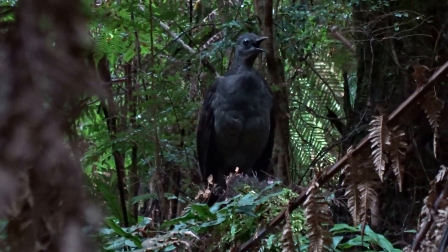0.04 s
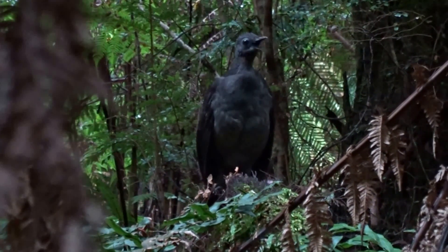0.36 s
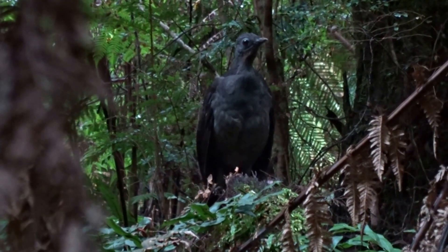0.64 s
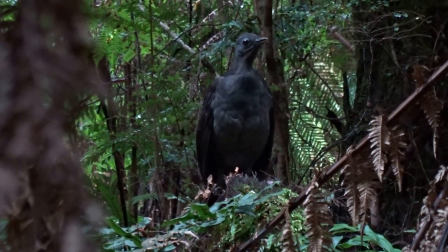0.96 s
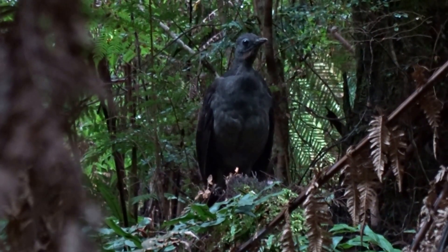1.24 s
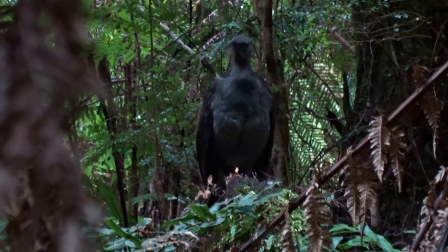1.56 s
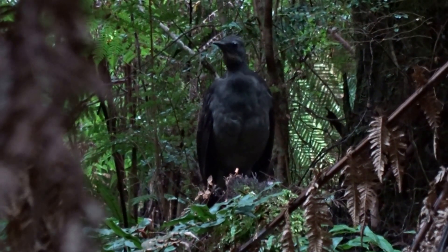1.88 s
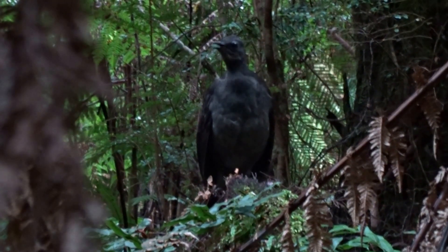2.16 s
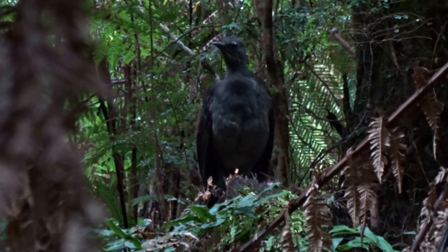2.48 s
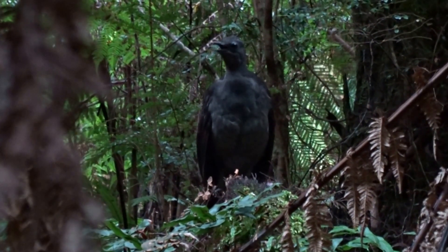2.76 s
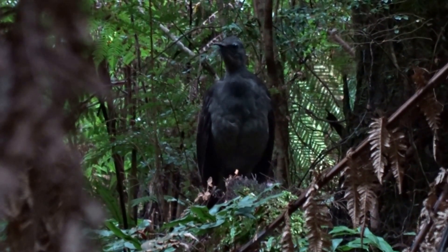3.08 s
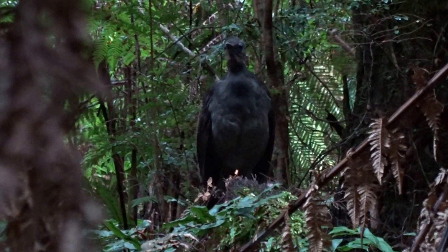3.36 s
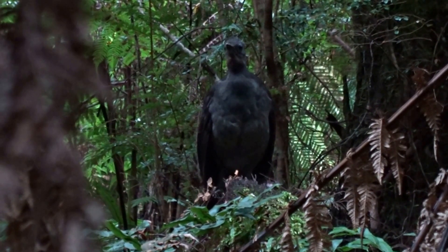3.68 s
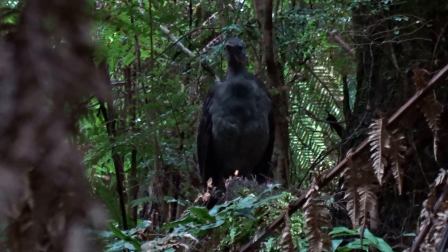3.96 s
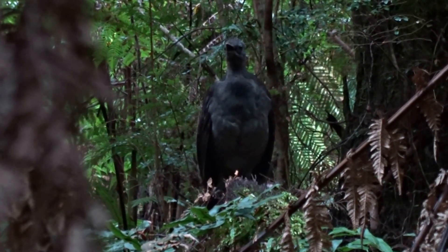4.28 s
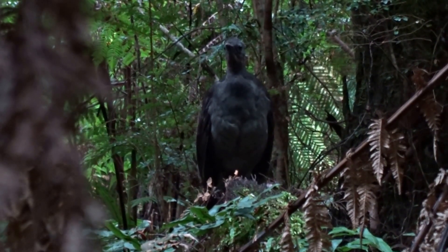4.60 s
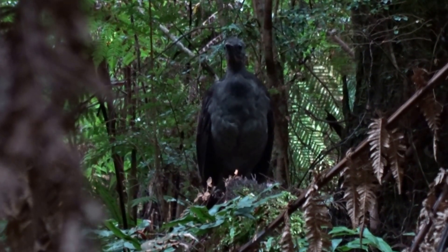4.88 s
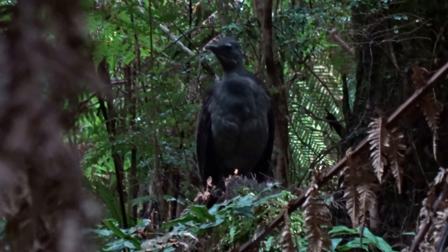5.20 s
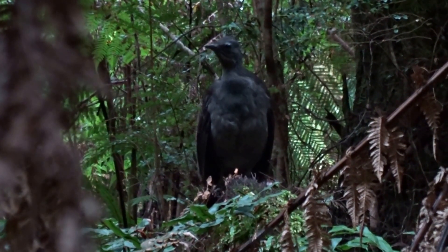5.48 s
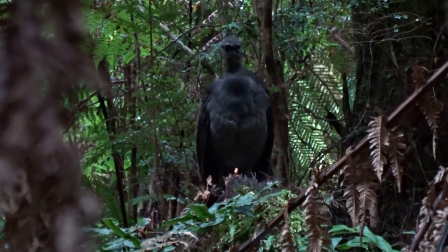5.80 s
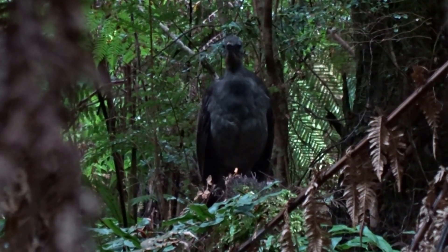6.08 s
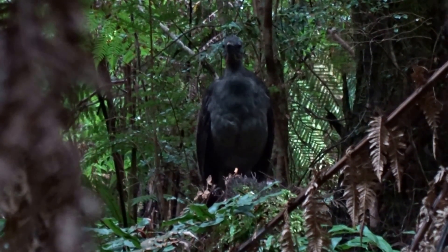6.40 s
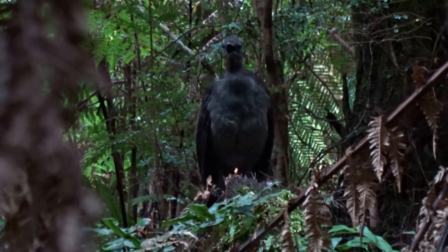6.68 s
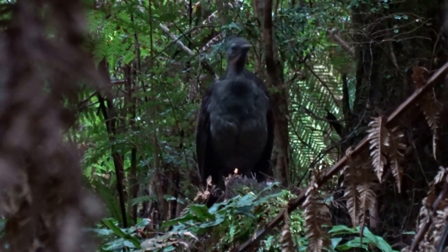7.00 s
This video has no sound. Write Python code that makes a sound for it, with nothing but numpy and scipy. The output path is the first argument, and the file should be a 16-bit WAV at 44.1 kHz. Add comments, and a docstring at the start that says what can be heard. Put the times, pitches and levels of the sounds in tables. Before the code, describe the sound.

A bird softly clucks and rattles, then gives whistles, whip-crack calls, a caw and a hoarse cry over steady forest hiss.

```python
"""Lyrebird in a wet fern forest.

The bird sings softly: whistled glides, whip cracks, rattles, nasal notes, a caw, a mew, a hoarse cry.
Its syrinx sounds harmonics and clicks through the throat; trunks scatter each call into a short tail.
Under it lie the even rush of the forest and microphone hiss, both stronger on the right."""
import sys
import numpy as np
from scipy import signal
from scipy.fft import rfft, irfft, next_fast_len
from scipy.io import wavfile

SR = 44100
rng = np.random.default_rng(int(sys.argv[2]) if len(sys.argv) > 2 else 0)


def store_pcm(level_fs):
    """Save levels as 16-bit WAV."""
    pcm = np.round(np.clip(level_fs, -1, 1) * 32767).astype(np.int16)
    wavfile.write(sys.argv[1], SR, np.atleast_2d(pcm).T)


N = 310905
TIME = np.arange(N) / SR
TOP_HZ = 15650

# overtones of whistles and clucks: freq_hz, gain_db
PURE_OVERTONES = [(1400, -29), (3000, -47), (4800, -37), (7000, -18), (8700, -23), (10800, -7.5),
                  (14000, -43)]
# throat response of caw and chuckle: freq_hz, gain_db
LOW_THROAT = [(550, -7), (1030, 3.5), (1200, 2.5), (1450, -22), (1570, -15), (1630, -2.5), (1700, 2),
              (1780, -13), (2200, -34), (3500, -29), (6000, -33), (11000, -32), (14000, -46)]
# throat response of rattles and chip: freq_hz, gain_db
CLICK_THROAT = [(120, -63), (400, 2), (1000, 8), (1700, -10), (2400, 9), (3100, -5), (4000, 3),
                (5200, -2.5), (6600, -1.5), (8500, -14), (10500, 3.5), (14000, -31)]


def undb(db):
    return 10 ** (np.asarray(db) / 20)


def unit(x):
    """Scale to rms 1."""
    return x / np.sqrt(np.mean(np.abs(x) ** 2) + 1e-20)


def at(points, hz):
    """Read (freq_hz, value) points on a log-frequency axis."""
    freq_hz, value = np.transpose(points)
    return np.interp(np.log(np.maximum(hz, 1)), np.log(freq_hz), value)


def colour(x, points, lead=((1, 0),)):
    """Filter by (freq_hz, gain_db) points and a (freq_hz, lead_rad) curve."""
    size = next_fast_len(len(x) + 2048)
    hz = np.fft.rfftfreq(size, 1 / SR)
    response = undb(at(points, hz)) * np.exp(1j * at(lead, hz))
    return irfft(rfft(x, size) * response, size)[:len(x)]


def flutter(count, hz):
    """Complex noise of rms 1 and Gaussian bandwidth hz."""
    size = next_fast_len(count + 4096)
    bins = rng.standard_normal(size) + 1j * rng.standard_normal(size)
    lowpass = np.exp(-.5 * (np.fft.fftfreq(size, 1 / SR) / hz) ** 2)
    return unit(np.fft.ifft(bins * lowpass))[:count]


def snap(decay_s, count=512):
    """Decaying noise burst."""
    return rng.standard_normal(count) * np.exp(-TIME[:count] / decay_s)


def add(out, start_s, x):
    i = max(int(start_s * SR), 0)
    out[i:i + len(x)] += x[:max(N - i, 0)]


def clock(length_s):
    return np.arange(int(max(length_s, .005) * SR)) / SR


def swell(t, attack_s, release_s):
    """Attack, hold, release; quarter-sine ramps."""
    rise = np.sin(np.pi / 2 * np.clip(t / attack_s, 0, 1))
    fall = np.sin(np.pi / 2 * np.clip((t[-1] - t) / release_s, 0, 1))
    return rise * fall


def arch(t, first, middle, last):
    """Parabola over a note."""
    u = t / t[-1]
    return first + (last - first) * u + (middle - (first + last) / 2) * (1 - (2 * u - 1) ** 2)


def gesture(rows):
    """Start time, then each further column of a (time_s, ...) table as a curve."""
    times, *columns = np.transpose(rows)
    t = times[0] + clock(times[-1] - times[0])
    return [times[0]] + [np.interp(t, times, column) for column in columns]


def syrinx(hz, rough, throat, pure=False, jitter=0.0034, rasp_hz=70, clean_db=-16.5, hoarse_db=-5.0):
    """Harmonics under the throat response; a rough membrane (0-1) smears each into a band."""
    rough, count = np.clip(rough, 0, 1), len(hz)
    phase = 2 * np.pi * np.cumsum(hz * (1 + jitter * flutter(count, 150).real)) / SR
    # a pure voice sheds overtones as it clears
    buzz = undb(np.interp(rough, [0, .5], [clean_db, hoarse_db])) if pure else 1
    voice = np.zeros(count)
    for k in range(1, int(TOP_HZ / hz.min()) + 1):
        gain = 1 if pure and k == 1 else buzz * undb(at(throat, k * hz)) * (k * hz < TOP_HZ)
        swing = np.sqrt(1 - rough ** 2) + rough * flutter(count, rasp_hz * np.sqrt(k))
        voice += gain * (swing * np.exp(1j * k * phase)).imag
    return voice


def whistle_tone(hz, rough, strain_db=0):
    """Near-pure voice, loudest at the throat resonance; strain lifts the overtones."""
    # throat resonance: pitch_hz, gain_db
    throat = [(720, -12), (900, -18), (1400, -12.5), (1800, -4.5), (2250, -1), (2720, -8.5), (2950, -20.5),
              (3300, -22), (4500, -47)]
    voice = syrinx(hz, rough, PURE_OVERTONES, pure=True, jitter=0.00069,
                   clean_db=strain_db - 24, hoarse_db=strain_db - 12)
    return undb(at(throat, hz)) * voice


def whistles(release_s=0.011):
    """Three arched glides and one upslur that hurries through its middle."""
    # glides: start_s, length_s, first_hz, middle_hz, last_hz, drive_db, attack_s, roughness
    glides = [(0, .03, 2300, 2600, 2840, -34.5, 0.00043, 0), (0.02, 0.12, 2920, 2460, 1940, -31, .1, 0.06),
              (5.109, 0.065, 745, 700, 630, -32, .02, .1)]
    # rising whistle: time_s, pitch_hz, drive_db
    upslur = [(3.508, 1760, -46), (3.533, 2055, -28.5), (3.56, 2770, -23.5), (3.58, 3080, -26),
              (3.62, 3400, -18.5), (3.63, 3500, -42)]
    out = np.zeros(N)
    for start_s, length_s, first_hz, middle_hz, last_hz, db, attack_s, rough in glides:
        t = clock(length_s)
        hz = arch(t, first_hz, middle_hz, last_hz)
        add(out, start_s, undb(db) * swell(t, attack_s, release_s) * whistle_tone(hz, rough))
    start_s, hz, db = gesture(upslur)
    add(out, start_s, undb(db) * whistle_tone(hz, rough=0.17))
    return out


def whips(sag_hz_per_s=567, break_hz=1290, break_octaves=0.3, break_rough=.9, base_rough=0.08):
    """A forced whistle plunges, breaks on the way and holds a low, sagging note."""
    # cracks: start_s, length_s, top_hz, held_hz, fall_octaves_per_s, first_db, last_db, attack_s
    cracks = [(3.276, .148, 4816, 785, 34.5, -16.5, -29, .0098),
              (3.643, .098, 2380, 860, 37, -29, -22.5, 0.0068)]
    out = np.zeros(N)
    for start_s, length_s, top_hz, held_hz, fall, first_db, last_db, attack_s in cracks:
        t = clock(length_s)
        hz = np.maximum(top_hz * 2 ** (-fall * t), held_hz - sag_hz_per_s * t)
        breaking = np.exp(-(np.log2(hz / break_hz) / break_octaves) ** 2)
        rough = base_rough + (break_rough - base_rough) * breaking
        drive = undb(np.linspace(first_db, last_db, len(t))) * swell(t, attack_s, release_s=0.0098)
        add(out, start_s, drive * whistle_tone(hz, rough, strain_db=9.5))
    return out


def nasal_notes(droop_share=0.0207, rough=0.3):
    """Four short, slightly arched notes rich in harmonics."""
    # notes: start_s, length_s, pitch_hz, climb_share, drive_db
    notes = [(4.194, 0.043, 1186, 0.03, -34.5), (4.278, 0.044, 1151, 0.056, -31),
             (4.368, 0.052, 1119, -0.013, -30.5), (4.473, 0.042, 1075, -0.0073, -32.5)]
    # throat response: freq_hz, gain_db
    throat = [(1100, -17), (2200, -5), (3350, -16), (4500, -23), (5600, -24), (6700, -28.5), (8300, -41),
              (9700, -23.5), (10500, -13.5), (11500, -28), (14000, -49)]
    out = np.zeros(N)
    for start_s, length_s, pitch_hz, climb, db in notes:
        t = clock(length_s)
        hz = pitch_hz * arch(t, 1 - climb / 2 - droop_share, 0.99, 1 + climb / 2 - droop_share)
        voice = syrinx(hz, rough, throat, jitter=0.0063)
        add(out, start_s, undb(db) * swell(t, attack_s=0.018, release_s=0.01) * voice)
    return out


def caw():
    """Two low, sinking pushes; the voice cracks between them."""
    # contour: time_s, pitch_hz, drive_db, roughness
    contour = [(5.11, 618, -55, .2), (5.135, 579.5, -43.5, .05), (5.162, 573.7, -44.5, .05),
               (5.172, 601, -34, .3), (5.183, 567, -44.5, 0.2), (5.2, 548, -40.5, 0),
               (5.235, 514, -37.5, 0.1), (5.243, 541, -48, 0.5), (5.282, 520, -53, 0.2)]
    out = np.zeros(N)
    start_s, hz, db, rough = gesture(contour)
    add(out, start_s, undb(db) * syrinx(hz, rough, LOW_THROAT, jitter=.005, rasp_hz=55))
    return out


def mew(air_db=-11):
    """A breathy second harmonic swells; as the bill opens, the others join and the pitch drops."""
    # contour: time_s, pitch_hz, drive_db, roughness, opening_share
    contour = [(5.67, 855, -49.5, 1, 0), (5.8, 861, -44.5, .9, 0), (5.828, 861, -34, 0.3, 0),
               (5.872, 860, -36.5, 0.28, 0.3), (5.918, 837, -34.5, 0.07, 0.5), (5.942, 820, -34, .5, 0.4),
               (5.96, 781, -37, .35, 0.7), (6.005, 742, -42, 0.1, .9), (6.034, 690, -50, 0.4, 0.9)]
    # throat response: freq_hz, gain_db
    throat = [(780, -4.5), (900, -31), (1450, -6), (1700, 0.5), (2250, -5), (2550, -11), (3200, -22),
              (3750, -23), (4100, -18.5), (4900, -33), (5600, -30), (8500, -44), (10500, -16.5),
              (11500, -21), (14000, -44)]
    # passband of the nearly closed bill: freq_hz, gain_db
    closed_bill = [(1100, -22), (1500, -3), (1950, 0), (2400, -9)]
    out = np.zeros(N)
    start_s, hz, db, rough, opening = gesture(contour)
    voice = syrinx(hz, rough, throat, jitter=0.0072, rasp_hz=119)
    voice = opening * voice + (1 - opening) * colour(voice, closed_bill)
    add(out, start_s, undb(db) * (voice + bill_air(rough, air_db)))
    return out


def cry(air_db=-6):
    """A hoarse, airy whistle swells, breaks and drops to a loud, clear note."""
    # contour: time_s, pitch_hz, level_db, roughness
    contour = [(6.56, 1695, -48, 1.1), (6.58, 1751, -43, 0.75), (6.66, 1845, -40.5, .65),
               (6.724, 1850, -38, 0.5), (6.735, 1790, -31.5, 0), (6.746, 1800, -40, 0.4),
               (6.757, 1800, -34.5, 0.3), (6.767, 1536, -41.5, 0.94), (6.789, 1674, -28.5, 0),
               (6.813, 1680, -31.5, 0.1), (6.824, 1700, -43, 0.5)]
    # overtones: freq_hz, gain_db
    overtones = [(3300, -26), (3750, -17), (5400, -38), (8500, -34), (11500, -24), (14000, -50)]
    out = np.zeros(N)
    start_s, hz, db, rough = gesture(contour)
    voice = syrinx(hz, rough, overtones, pure=True, jitter=0.0047, rasp_hz=137,
                   clean_db=-24, hoarse_db=-3)
    add(out, start_s, undb(db) * (voice + bill_air(rough, air_db)))
    return out


def bill_air(rough, db):
    """Turbulence in the bill, as strong as the voice is rough."""
    # air spectrum: freq_hz, gain_db
    spectrum = [(600, -37), (1300, -9), (1700, 6), (2050, -7), (2400, -2), (2900, -22), (3800, -17),
                (5000, -32), (14000, -45)]
    return undb(db) * np.clip(rough, 0, 1) * unit(colour(rng.standard_normal(len(rough)), spectrum))


def sizzle(width_hz=330, skirt_hz=1100, skirt_db=-5):
    """Air hisses in a narrow, high resonance as the bird strains in caw, mew and cry."""
    # hisses: start_s, length_s, centre_hz, level_db, attack_s, release_s
    hisses = [(5.1, 0.096, 10900, -56, 0.027, .05), (5.741, 0.24, 10520, -51, 0.19, 0.079),
              (6.525, .265, 11200, -51, 0.26, 0.013)]
    out = np.zeros(N)
    for start_s, length_s, hz, db, attack_s, release_s in hisses:
        t = clock(length_s)
        air = flutter(len(t), width_hz) + undb(skirt_db) * flutter(len(t), skirt_hz)
        band = unit((air * np.exp(2j * np.pi * hz * t)).real)
        add(out, start_s, undb(db) * swell(t, attack_s, release_s) * band)
    return out


def clucks(edge_db=-9, bend_share=0.025):
    """Soft, breathy notes that swell and climb a little."""
    # notes: start_s, length_s, pitch_hz, level_db, roughness
    notes = [(0.784, 0.066, 509.6, -44.5, 0.89), (1.188, 0.03, 550, -36.5, 0.44),
             (1.32, .087, 491.7, -44, 0.65), (1.385, 0.078, 540, -45, 0.71), (1.564, 0.016, 1007, -40, 0.2),
             (1.817, .13, 553, -43.5, 0.72), (2.624, 0.021, 773, -39, 0.1), (2.65, .03, 684, -42, 0.5),
             (3.87, 0.019, 472, -44, 0.24), (4.237, 0.015, 453, -40.5, 0), (4.652, 0.034, 576, -42, 0.35)]
    out = np.zeros(N)
    for start_s, length_s, hz, db, rough in notes:
        t = clock(length_s)
        u = np.linspace(-1, 1, len(t))
        voice = syrinx(hz * (1 + bend_share * u), rough, PURE_OVERTONES, pure=True,
                       rasp_hz=99, hoarse_db=-19.0)
        envelope = undb(db + edge_db * np.abs(u)) * swell(t, attack_s=0.0066, release_s=0.01)
        add(out, start_s, envelope * voice)
    return out


def chucks(attack_share=0.36, release_share=0.38):
    """Dull puffs through the closed bill."""
    # puffs: start_s, length_s, level_db
    puffs = [(.618, 0.0098, -44), (2.731, 0.037, -42), (2.846, 0.019, -42.5), (2.864, 0.033, -42.5),
             (3.005, 0.014, -44.5)]
    # throat response: freq_hz, gain_db
    throat = [(300, -32), (1000, 0.5), (1600, -6), (2150, 4.5), (2650, -6), (3200, -32), (6000, -27),
              (14000, -42)]
    out = np.zeros(N)
    for start_s, length_s, db in puffs:
        t = clock(length_s)
        puff = unit(colour(rng.standard_normal(len(t)), throat))
        add(out, start_s, undb(db) * swell(t, attack_share * length_s, release_share * length_s) * puff)
    return out


def chuckle(attack_s=0.004, release_s=0.0063, rough=.15):
    """Five clipped notes in the caw's voice, climbing and slowing."""
    # notes: start_s, length_s, pitch_hz, drive_db
    notes = [(2.077, .023, 477, -44.5), (2.11, 0.03, 508, -42), (2.15, 0.024, 500, -41),
             (2.201, .019, 520, -38.5), (2.252, 0.02, 539, -45)]
    out = np.zeros(N)
    for start_s, length_s, hz, db in notes:
        t = clock(length_s)
        voice = syrinx(np.full(len(t), hz), rough, LOW_THROAT, jitter=0.0098, rasp_hz=91)
        add(out, start_s, undb(db) * swell(t, attack_s, release_s) * voice)
    return out


def rattles(decay_s=0.001, ring_s=0.00083, ring_db=-5, rasp_db=-4, scatter_db=1.4, count=8192):
    """Membrane slaps of uneven strength over a soft rasp, ringing the throat."""
    # click trains: start_s, length_s, rate_hz, drive_db, bright_db, ring_hz
    trains = [(.4305, 0.058, 114, -52, 3, 2270), (0.9154, 0.083, 122, -54.5, -5, 2460),
              (1.53, 0.064, 140, -52.5, -4, 2600)]
    out = np.zeros(N)
    for start_s, length_s, rate_hz, db, bright_db, ring_hz in trains:
        slaps, rings = np.zeros((2, count))
        ring = np.sin(2 * np.pi * ring_hz * TIME[:512]) * np.exp(-TIME[:512] / ring_s)
        for slap_s in np.arange(0, length_s, 1 / rate_hz):
            size = np.interp(slap_s / length_s, [0, .2, .4, .7, 1], [.35, .9, 1, .3, .15])
            size *= undb(scatter_db * rng.standard_normal())
            add(slaps, slap_s, size * unit(snap(decay_s)))
            add(rings, slap_s, size * ring)
        rasp = rng.standard_normal(count) * np.sin(np.pi * np.minimum(TIME[:count] / length_s, 1))
        source = unit(slaps) + undb(rasp_db) * unit(rasp)
        train = unit(colour(source, CLICK_THROAT)) + undb(ring_db) * unit(rings)
        train = colour(train, [(2600, 0), (3700, bright_db)])
        add(out, start_s, undb(db) * unit(train) * np.sqrt(length_s * SR / count))
    return colour(out, [(120, -30), (450, 4.5)])


def chip(crack_db=-6, crack_s=0.0092, wander_hz=220, attack_s=0.0036, highpass_hz=900):
    """A hard slap and its rebound ring the unsteady resonances of the throat."""
    # slaps: start_s, drive_db
    slaps = [(3.075, -24), (3.085, -43)]
    # throat modes: freq_hz, gain_db, t60_s
    modes = [(1650, -11, 0.027), (2300, 5.5, 0.02), (3340, -24, 0.012), (4640, -11, 0.03),
             (5760, -15, 0.027), (6040, -18, 0.014), (6880, -12, 0.029), (8900, -21, 0.0123),
             (10540, -13, 0.057), (11300, -33, .012)]
    out, t = np.zeros(N), TIME[:4096]
    for start_s, db in slaps:
        ring = np.zeros(len(t))
        for hz, mode_db, t60_s in modes:
            phase = 2 * np.pi * np.cumsum(hz + wander_hz * flutter(len(t), 200).real) / SR
            ring += undb(mode_db - 60 * t / t60_s) * np.sin(phase)
        crack = colour(snap(crack_s, len(t)), CLICK_THROAT)
        add(out, start_s, undb(db) * np.minimum(t / attack_s, 1) * (ring + undb(crack_db) * crack))
    return signal.sosfilt(signal.butter(2, highpass_hz, "high", fs=SR, output="sos"), out)


def ticks(decay_s=.0009):
    """Dry, high ticks of bill and leaf litter."""
    # ticks: start_s, peak_db
    hits = [(.427, -37), (1.6985, -33), (1.71, -39), (2.2083, -37), (2.2905, -39), (5.112, -39),
            (5.364, -36), (5.5022, -35)]
    out = np.zeros(N)
    for start_s, db in hits:
        tick = colour(snap(decay_s), [(300, -60), (3500, -16.0), (7500, -5), (10500, 13), (14000, -19)])
        add(out, start_s, undb(db) * tick / np.abs(tick).max())
    return out


def knocks(decay_s=0.012, attack_s=0.005):
    """Dull, pitchless thuds in the undergrowth."""
    # thuds: start_s, level_db
    thuds = [(0.846, -36.5), (.964, -44), (1.497, -43), (2.3, -42), (3.483, -37.5), (5.712, -40.5)]
    # thud spectrum: freq_hz, gain_db
    spectrum = [(50, -60), (170, -42), (380, -9), (650, 5.5), (1400, -4), (2200, -28), (5000, -52)]
    out, t = np.zeros(N), TIME[:4096]
    envelope = np.minimum(t / attack_s, 1) * np.exp(-t / decay_s)
    for start_s, db in thuds:
        add(out, start_s, undb(db) * envelope * unit(colour(rng.standard_normal(len(t)), spectrum)))
    return out


def litter(drive_db=-60, scatter_db=2, decay_s=0.00095, count=35):
    """Faint, random crackles of drips and leaves."""
    out = np.zeros(N)
    for start_s, size in zip(rng.random(count) * N / SR, rng.standard_normal(count)):
        add(out, start_s, undb(drive_db + scatter_db * min(size, 2)) * snap(decay_s))
    return colour(out, [(300, -36), (3500, -4), (7000, 17.5), (10500, 20.5), (14000, -5)])


def trunks(x, near_db=-22, near_s=0.01, far_db=-13.0, t60_s=0.68, build_s=0.018, count=40000):
    """Early echoes off ground and near trunks, then a flickering, diffuse tail from the deeper wood."""
    # scattering response: freq_hz, gain_db
    scattering = [(400, 4), (1100, 5), (1700, 8.5), (2250, 1.5), (4000, 2.5), (6000, 6), (12000, 2)]
    t = TIME[:count]
    near = rng.standard_normal(count) ** 3 * np.exp(-t / near_s) * (t > .008)  # cubed: spiky echoes
    far = rng.standard_normal(count) * undb(-60 * t / t60_s) * np.minimum(t / build_s, 1)
    early = signal.fftconvolve(x, unit(near))[:N]
    tail = signal.fftconvolve(x, signal.hilbert(unit(far)))[:N]
    tail = (tail * (.88 + .45 * flutter(N, 60))).real
    return colour((undb(near_db) * early + undb(far_db) * tail) / np.sqrt(count), scattering)


def rush(right_rms_db=-47.5, waver_db=1.5, waver_hz=8):
    """Stereo forest rush and microphone hiss; the middle bands waver a little."""
    # noise spectrum: freq_hz, density_db
    spectrum = [(30, -38.5), (100, -35), (180, -27.5), (260, -11.5), (340, -2.5), (550, 1), (800, -1.5),
                (1120, 0.2), (1500, -2.5), (2200, -7.5), (3000, -16), (3900, -20), (7000, -15.5),
                (8800, -18), (10400, -11), (12500, -22.5), (15300, -35)]
    # left against right: freq_hz, gain_db, coherence, lead_rad
    stereo = [(50, 2, 0.01, 0.94), (150, -2, 0.8, 0.38), (312, -1.5, 0.78, -0.23), (510, -7, 0.6, -0.45),
              (880, -12.5, 0.1, 0.12), (1030, -5.5, 0.42, 0.33), (1840, -8, 0.47, 0.99),
              (2460, -9.5, 0.9, 0.83), (3630, -4.5, 0.94, 0.96), (6740, -3.5, 0.83, 0.23),
              (10800, -2.5, 1, -0.085)]
    hz = np.fft.rfftfreq(N, 1 / SR)
    right, independent = rfft(rng.standard_normal((2, N)))
    left_db, coherence, lead_rad = (at(np.array(stereo)[:, [0, k]], hz) for k in (1, 2, 3))
    left = np.sqrt(coherence) * np.exp(1j * lead_rad) * right + np.sqrt(1 - coherence) * independent
    sides = np.array([undb(left_db) * left, right]) * undb(at(spectrum, hz))
    out = irfft(sides, N)
    for low_hz in 300 * 2 ** (np.arange(5) / 2):  # half-octave bands
        band = irfft(sides * ((hz >= low_hz) & (hz < low_hz * np.sqrt(2))), N)
        out += band * (undb(waver_db * unit(flutter(N, waver_hz).real)) - 1)
    return out * undb(right_rms_db) / np.std(out[1])


def scene(spread_db=-3):
    """Bird to the right; a second set of echoes on the left widens it."""
    # left against right: freq_hz, gain_db
    left_gain = [(400, -3.5), (750, -13.5), (1100, -11), (1700, -16), (2150, -7.5), (3300, -12), (7000, 1),
                 (11000, -2)]
    # left phase lead: freq_hz, lead_rad
    left_lead = [(700, 0.51), (1100, 0.61), (1700, 1.37), (2200, 1.12), (3200, 1.1), (7000, 0.33),
                 (11000, 0.17)]
    direct = whistles() + whips() + nasal_notes() + caw() + mew() + cry() + sizzle()
    direct = direct + clucks() + chucks() + knocks() + chuckle() + rattles() + chip() + ticks() + litter()
    right = direct + trunks(direct)
    left = colour(right + undb(spread_db) * trunks(direct), left_gain, left_lead)
    return np.array([left, right]) + rush()


def record(dry):
    """Steep low-pass at TOP_HZ."""
    return signal.sosfilt(signal.ellip(10, .2, 70, TOP_HZ, fs=SR, output="sos"), dry)


dry = scene()
out = record(dry)
store_pcm(out)
```